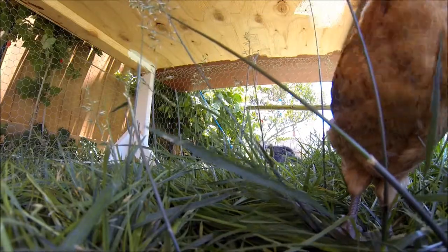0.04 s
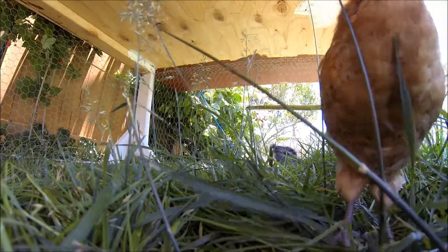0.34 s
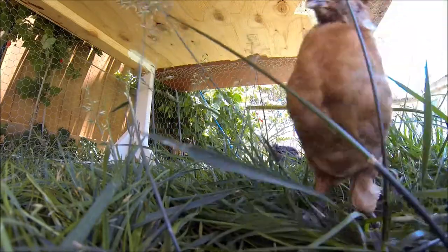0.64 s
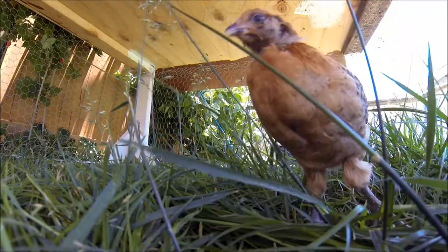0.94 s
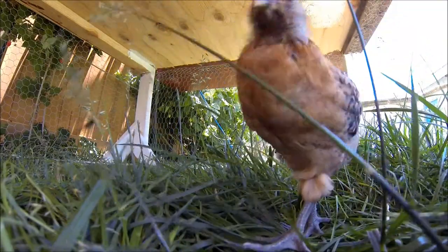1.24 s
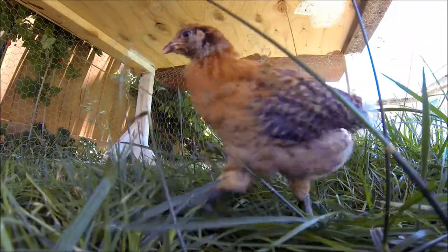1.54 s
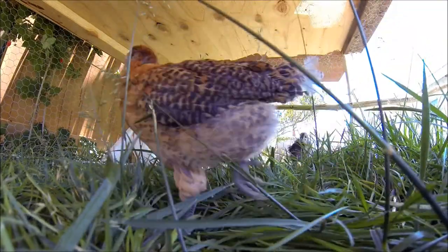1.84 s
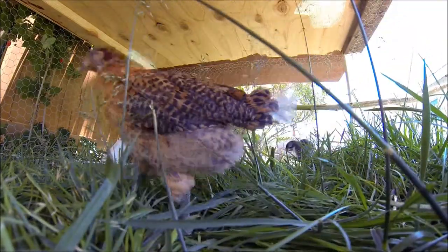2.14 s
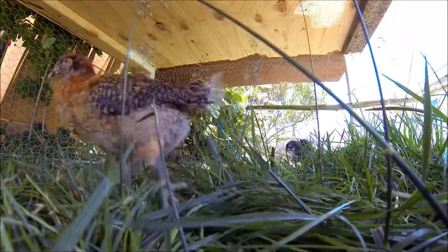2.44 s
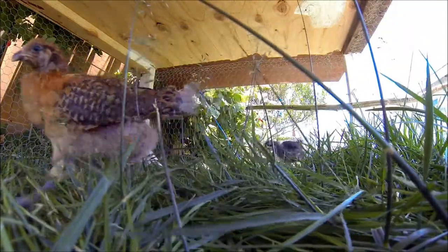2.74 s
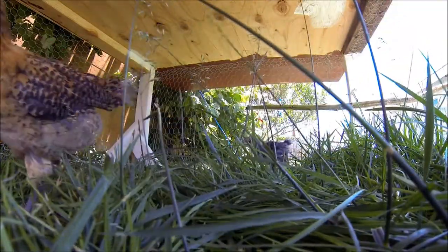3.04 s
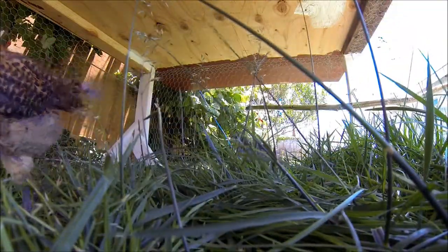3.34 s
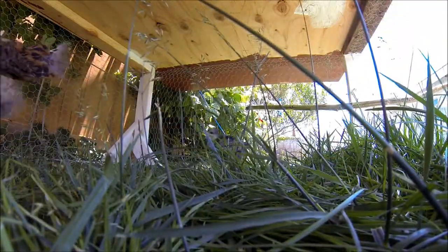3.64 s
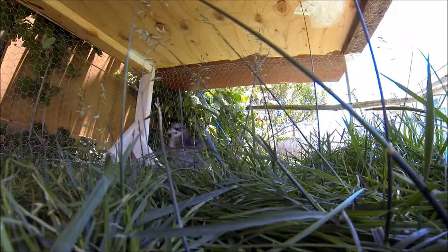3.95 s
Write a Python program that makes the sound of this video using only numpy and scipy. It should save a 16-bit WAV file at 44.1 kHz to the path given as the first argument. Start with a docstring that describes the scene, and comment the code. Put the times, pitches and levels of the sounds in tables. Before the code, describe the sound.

High chick peeps and falling whistles, with crackling steps and grass brushing the microphone.

```python
"""Chicks in a grassy run

Young chickens peep in trilled whistles under a plywood roof, close to a small camera on the ground.
One walks past: grass drags over the housing by stick-slip friction, a stalk strikes its modes,
and stems snap underfoot. Beneath lie a low outdoor rumble, a faint far hum, a soft hiss
and the camera's thin electronic whine."""
import sys
import numpy as np
from scipy import signal
from scipy.fft import rfft, irfft, next_fast_len
from scipy.io import wavfile
from scipy.ndimage import uniform_filter1d, map_coordinates

SR = 44100
rng = np.random.default_rng(int(sys.argv[2]) if len(sys.argv) > 2 else 0)


def dump_mix(stems):
    """Bounce the given channels to the path in sys.argv[1] as a 16-bit WAV at rate SR."""
    frames = np.atleast_2d(stems).T  # one column per channel
    limited = np.clip(frames, -1, 1)  # hard clip at full scale
    pcm = np.round(limited * 32767).astype(np.int16)
    wavfile.write(sys.argv[1], SR, pcm)


N = 176400

# bright spectrum of snapping stems and fizzing blades: f/Hz, level/dB
CRACKLE_SPECTRUM = [(300, -2), (2000, -43), (4000, -8), (5400, 3), (7000, -3.5), (9500, 0), (12000, -13),
                    (15000, -23)]


def amp(db):
    """Amplitude ratio of a level in decibels."""
    return 10 ** (np.asarray(db) / 20)


def unit(x):
    """Normalisation to rms 1."""
    return x / np.sqrt(np.mean(x ** 2) + 1e-20)


def clock():
    """Sample times in seconds."""
    return np.arange(N) / SR


def level(rows):
    """Amplitude envelope interpolated through rows of t/s, level/dB."""
    return amp(np.interp(clock(), *np.transpose(rows)))


def arches(rows):
    """Superposed half-sine envelopes from rows of t/s, duration/s, level/dB."""
    return sum(amp(db) * np.sin(np.pi * np.clip((clock() - s) / length, 0, 1)) for s, length, db in rows)


def wobble(rate):
    """Random modulation: a spline through `rate` Gaussian values a second."""
    return map_coordinates(rng.standard_normal(int(N * rate / SR) + 4), [clock() * rate])


def filtered(x, response):
    """Linear filtering: the spectrum of x times a frequency response."""
    size = next_fast_len(N + SR // 2)
    return irfft(rfft(x, size) * response(np.fft.rfftfreq(size, 1 / SR)), size)[:N]


def coloured(x, spectrum):
    """Spectral shaping by rows of f/Hz, level/dB, with roll-off outside them, at rms 1."""
    f, db = np.transpose(spectrum)
    f = np.r_[f[0] / 2, f, f[-1] * 2]
    db = np.r_[db[0] - 20, db, -120]
    return unit(filtered(x, lambda hz: amp(np.interp(np.log(hz + 1), np.log(f), db))))


def noise(spectrum):
    """Gaussian noise with the given spectral envelope."""
    return coloured(rng.standard_normal(N), spectrum)


def slips(per_s, spread_db):
    """Stick-slip friction as a Poisson train of impulses of random sign and size."""
    impulses = (rng.random(N) < per_s / SR) * rng.choice([-1, 1], N)
    return impulses * amp(spread_db * np.minimum(rng.exponential(size=N), 4))


def bursts(rows, t60_s):
    """Envelope of fast attacks and exponential decays from rows of t/s, level/dB."""
    envelope = np.zeros(N)
    for s, db in rows:
        t = np.maximum(clock()[round(s * SR):][:SR // 4] - s, 0)
        attack = 1 - np.exp(-t / .0006)
        add(envelope, s, amp(db - 60 * t / t60_s) * attack / 2)
    return envelope


def add(track, s, sound):
    """Superposition of a sound on a track, from s seconds on."""
    part = track[round(s * SR):][:len(sound)]
    part += sound[:len(part)]


def rumble_and_hum():
    """Slow amplitude modulation of low-frequency noise: a broad rumble and a narrow-band far hum."""
    # spectra: f/Hz, level/dB
    rumble_spectrum = [(20, 2), (30, -2.5), (42, 4), (52, -1.5), (100, -2), (127, -7), (215, -19),
                       (310, -23.5), (445, -33.5), (780, -48.5)]
    hum_spectrum = [(270, -18), (320, -8), (385, -16)]
    # envelopes: t/s, level/dB
    rumble_swell = [(0, -33.5), (1.75, -36), (1.95, -34.5), (2.7, -36), (3.45, -33.5)]
    hum_swell = [(1.8, -69), (2.4, -52.5), (3.1, -69.5), (3.45, -53), (4, -58.5)]
    return level(rumble_swell) * noise(rumble_spectrum) + level(hum_swell) * noise(hum_spectrum)


def hiss(flutter_hz=47):
    """Steady broadband noise, plus a band that flutters by sinusoidal amplitude modulation."""
    # spectra: f/Hz, level/dB
    steady_spectrum = [(400, 8), (800, 3), (1200, -3.5), (2000, -5.5), (3000, -2), (4400, -9.5), (5200, -4),
                       (7000, -15), (9000, -12.5), (10200, -4), (11100, -14.5), (12700, -19.5),
                       (13200, -12), (13800, -32), (15300, -22)]
    flutter_spectrum = [(1500, -9), (2500, -6), (3000, -2), (3800, -6), (5000, -20)]
    flutter = unit(1 + np.sin(2 * np.pi * flutter_hz * clock())) * noise(flutter_spectrum)
    return amp(-60) * noise(steady_spectrum) + amp(-62.5) * flutter


def whine():
    """Steady pure tones from the camera's electronics; the close pair beats."""
    # partials: f/Hz, rms level/dB
    partials = [(10645, -67.5), (10693, -71.5), (13187, -86)]
    return sum(np.sqrt(2) * amp(db) * np.sin(2 * np.pi * hz * clock()) for hz, db in partials)


def rustle():
    """Friction of feathers and grass: many tiny slips merge into an unsteady noise."""
    # envelope: t/s, level/dB
    swell = [(0, -58.5), (.25, -78), (.55, -58), (.7, -58.5), (1.03, -66), (1.12, -52), (1.22, -55),
             (1.3, -49), (1.4, -66.5), (1.5, -49), (1.56, -59), (1.68, -55), (1.95, -62), (2.15, -69),
             (2.27, -61.5), (2.9, -59), (3.25, -66.5), (3.42, -61.5), (4, -64)]
    # spectrum: f/Hz, level/dB
    spectrum = [(400, -11), (1500, 7.5), (5000, -1), (8000, -5), (10000, -3), (12000, -17), (15000, -29)]
    return level(swell) * amp(1.2 * wobble(60)) * coloured(slips(per_s=1200, spread_db=2.5), spectrum)


def dragging_grass(shake_db=2.5):
    """Stick-slip friction of blades on the housing, swelling and fading with each stroke."""
    # strokes: t/s, duration/s, level/dB
    strokes = [(0.22, 0.028, -52), (0.254, 0.17, -52), (0.419, 0.17, -41), (0.563, 0.016, -38.5),
               (0.574, 0.11, -51.5), (0.687, 0.071, -50), (0.745, 0.11, -49.5), (1.097, 0.14, -44.5),
               (1.213, 0.16, -40.5), (1.353, 0.018, -42), (1.45, 0.092, -37.5), (1.367, 0.069, -51),
               (1.5, .3, -52.5), (2.5, 0.017, -47), (2.75, 0.015, -49), (2.807, 0.026, -51),
               (3.36, 0.081, -52.5)]
    # spectrum: f/Hz, level/dB
    spectrum = [(300, -8.5), (1100, -30), (1450, -6), (1700, -1.5), (1920, 4), (2200, -12.5), (2600, -30),
                (3100, -9), (3550, -12), (4100, -17), (4900, -30), (5350, -25), (6000, -30), (10000, -34),
                (15000, -57)]
    pressure = arches(strokes) * unit(amp(shake_db * wobble(160)))
    return pressure * coloured(slips(per_s=870, spread_db=0.5), spectrum)


def voice(pitch_hz, db, trill, octave_db):
    """A whistle under amplitude and frequency modulation; trill (0-1) adds roughness and a husky octave."""
    trill_hz, edge_s = 260, .0024
    swing_hz, jitter_share, rasp_db, fuzz_share = 120, .022, 8.5, .85  # at full trill
    t = np.arange(len(pitch_hz)) / SR
    drift, rasp, jitter, fuzz = [map_coordinates(rng.standard_normal(256), [t * rate])
                                 for rate in (60, 140, 900, 800)]
    shake = np.sin(2 * np.pi * np.cumsum(trill_hz * (1 + 0.04 * drift)) / SR)
    glide_hz = uniform_filter1d(pitch_hz, size=200)
    hz = glide_hz * (1 + jitter_share * trill * jitter) + swing_hz * trill * shake
    phase = 2 * np.pi * np.cumsum(hz) / SR
    edge = np.clip(np.minimum(t, t[-1] - t) / edge_s, 0, 1)
    envelope = edge * amp(db) * unit((1 + trill * shake) * amp(rasp_db * trill * rasp))
    octave = trill ** 2 * amp(octave_db) * (np.sqrt(1 - fuzz_share ** 2) + fuzz_share * fuzz)
    return np.sqrt(2) * envelope * (np.sin(phase) + octave * np.sin(2 * phase))


def peeps():
    """Short frequency glides through five turning points: start, crest, sag, hook and end."""
    # calls: t/s, duration/s, f/Hz at each of the five points, level/dB, trill depth
    calls = [(0.268, 0.068, 2900, 3013, 2980, 3480, 2720, -38, 0.11),
             (.433, 0.071, 2820, 3854, 3460, 4000, 2390, -38.5, 0.38),
             (2.179, 0.074, 3180, 3040, 2880, 2980, 2690, -52, .05),
             (2.331, 0.076, 3400, 3550, 3080, 3650, 2880, -53, 0.32),
             (2.504, 0.079, 3490, 3990, 3600, 4150, 2060, -50, 0.44),
             (3.461, .085, 3365, 3455, 3090, 3200, 2400, -53, 0.53),
             (3.638, 0.083, 3200, 3900, 3480, 3560, 2350, -46, 0.38),
             (3.887, 0.089, 2740, 3826, 3360, 3920, 2120, -45.5, 0.36)]
    # at the five points: share of the duration; relative level/dB; octave level/dB at full trill
    points = [0, .22, .63, .79, 1]
    swell_db = [-5, -0.5, 1.5, -6, -0.5]
    octave_db = [-22, 2, -5, -13, -25]
    out = np.zeros(N)
    for s, length, *contour_hz, db, trill in calls:
        progress = np.linspace(0, 1, int(length * SR))
        leg, part = np.divmod(np.interp(progress, points, np.arange(5)), 1)
        ease = np.sin(np.pi * part / 2) ** np.where(leg == 0, 1, 2)
        pitch_hz = np.interp(leg + ease, np.arange(5), contour_hz)
        call_db = db + np.interp(progress, points, swell_db)
        add(out, s, voice(pitch_hz, call_db, trill, np.interp(progress, points, octave_db)))
    return out


def roof(x, t60_s=0.099):
    """Reverberation from the plywood roof and fence: convolution with exponentially decaying noise."""
    t = np.arange(SR // 4) / SR
    tail = rng.standard_normal(len(t)) * amp(-60 * t / t60_s) * (t > .003)
    return signal.fftconvolve(x, tail / np.linalg.norm(tail))[:N]


def footsteps():
    """Fracture and impact: a stem snaps in a bright burst over a duller, longer footfall."""
    # steps: t/s, snap level/dB, footfall level/dB relative to the snap
    steps = [(.354, -41, -6), (0.527, -45, -11), (0.946, -40.5, -4), (1.501, -36, -12), (2.243, -33, -11.5),
             (2.262, -43, -5), (2.288, -36.5, -9), (2.297, -44, -3.5), (2.51, -43, -12), (2.754, -47, -12),
             (2.832, -47, -6), (3.5878, -37, -3)]
    # footfall spectrum: f/Hz, level/dB
    foot_spectrum = [(150, -8), (500, -5.5), (1000, -11), (2200, -13), (4000, -58)]
    snaps = bursts([(s, db) for s, db, _ in steps], t60_s=0.03) * noise(CRACKLE_SPECTRUM)
    feet = bursts([(s, db + weight) for s, db, weight in steps], t60_s=0.11) * noise(foot_spectrum)
    return snaps + feet


def catching_blades():
    """Damped transients: blades catch on an edge, each giving a brief burst of noise."""
    # catches: t/s, level/dB
    catches = [(.570, -38), (1.145, -32), (1.1887, -27), (1.272, -30), (1.3174, -26.5), (1.357, -30),
               (1.468, -30.5)]
    # spectrum: f/Hz, level/dB
    spectrum = [(1000, -22), (1900, -10), (2600, -9), (3400, 10.5), (4500, -10), (5400, -0.5), (6500, -37),
                (15000, -41)]
    return bursts(catches, t60_s=.03) * noise(spectrum)


def stalk_knocks():
    """Impulse excitation: a stalk slaps and chatters on the housing, ringing its damped modes."""
    # slaps: t/s, peak level/dB
    slaps = [(0.7625, -26), (.7653, -9.5), (0.7682, -36), (0.77, -14), (0.7731, -13), (0.7763, -35),
             (0.869, -21), (0.9467, -32), (0.9539, -36)]
    # housing modes: f/Hz, bandwidth/Hz, relative level/dB at resonance
    modes = [(1658, 120, 9), (1887, 140, 15), (2400, 160, -6), (2760, 120, -0.5), (4160, 150, -11)]
    band_hz = [1020, 6000]  # the small housing radiates little below, the soft stalk excites little above
    t = np.arange(SR // 20) / SR
    ring = sum(amp(db) * width * np.exp(-np.pi * width * t) * np.sin(2 * np.pi * hz * t)
               for hz, width, db in modes)
    ring = signal.sosfilt(signal.butter(3, band_hz, "band", fs=SR, output="sos"), ring)
    out = np.zeros(N)
    for s, db in slaps:
        add(out, s, amp(db) * ring / np.abs(ring).max())
    return out


def swiping_blade():
    """Fast sliding friction: one blade crosses the housing in dense slips, with fizz during the crossing; a
    further puff of fizz comes with the stalk's slap."""
    # swipe envelope: t/s, level/dB
    swell = [(.837, -100), (.842, -45), (.848, -30.5), (.859, -23.5), (.868, -28), (.873, -32),
             (.882, -37.5), (.894, -44), (.899, -100)]
    # swipe spectrum: f/Hz, level/dB
    spectrum = [(500, -23), (1150, -21), (1500, -8), (1900, 4), (2650, -10.5), (3200, -10.5), (3900, -2.5),
                (4350, -12.5), (5200, -8), (6700, -25), (9400, -28), (15000, -36)]
    # puffs of bright noise: t/s, duration/s, level/dB
    fizzes = [(0.76, .018, -50), (.856, 0.04, -44)]
    swipe = level(swell) * coloured(slips(per_s=4300, spread_db=1.0), spectrum)
    return swipe + arches(fizzes) * noise(CRACKLE_SPECTRUM)


def falling_calls():
    """Long downward glides; slow frequency modulation breaks the fall into steps, thinning at each."""
    # calls: t/s, duration/s, first and last f/Hz, exponent delaying the fall,
    # early, middle and late level/dB, trill depth
    calls = [(1.529, .11, 3440, 2400, 1.34, -49.5, -56, -49, 0.4),
             (2.383, .162, 4184, 2387, 1.15, -54.5, -52, -44, 0.36),
             (2.669, .135, 4205, 2180, 1.7, -49.5, -51.5, -43, 0.35)]
    # share of the duration at start, early, middle, late and end
    points = [0, .2, .5, .8, 1]
    step_rate_hz, step_depth, break_db, fade_db = 29.2, 0.037, 3.5, 7.5
    out = np.zeros(N)
    for s, length, first_hz, last_hz, hold, early, middle, late, trill in calls:
        progress = np.linspace(0, 1, int(length * SR))
        fall = np.sin(np.pi * progress ** hold / 2) ** 2
        mid_fall = np.sin(np.pi * fall)
        step_phase = 2 * np.pi * step_rate_hz * length * progress
        glide_hz = first_hz + (last_hz - first_hz) * fall
        pitch_hz = glide_hz * (1 + step_depth * mid_fall * np.sin(step_phase))
        db = np.interp(progress, points, [early - fade_db, early, middle, late, late - fade_db])
        db += break_db * mid_fall * (np.cos(step_phase) - .5)
        add(out, s, voice(pitch_hz, db, trill, octave_db=-1.5))
    return out


def scene():
    """Superposition of the background, the calls with their reverberation, and the contact sounds."""
    calls = peeps() + falling_calls()
    reverberation = amp(-11) * roof(calls)
    on_housing = dragging_grass() + catching_blades() + stalk_knocks() + swiping_blade()
    walking = rustle() + footsteps()
    return (rumble_and_hum() + hiss() + calls + reverberation + on_housing + walking)[None]


def record(dry):
    """Band limiting: the camera adds its whine and passes nothing above its cutoff."""
    cutoff_hz = 15400
    return filtered(dry[0] + whine(), lambda hz: hz < cutoff_hz)[None]


dry = scene()
out = record(dry)
dump_mix(out)
```